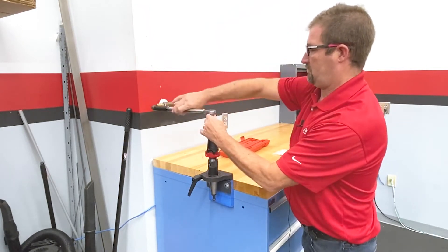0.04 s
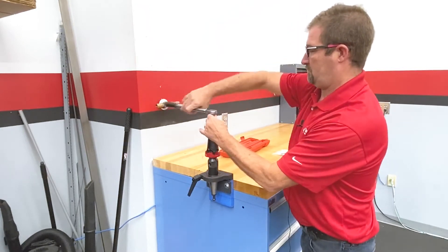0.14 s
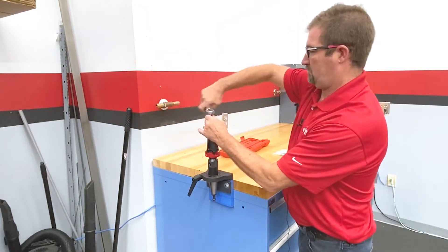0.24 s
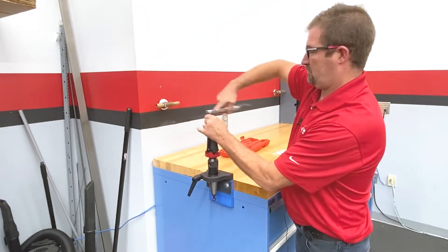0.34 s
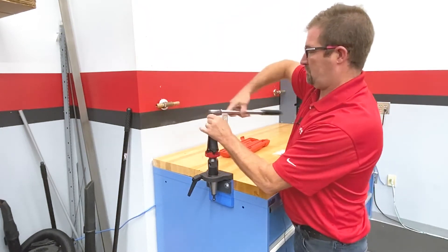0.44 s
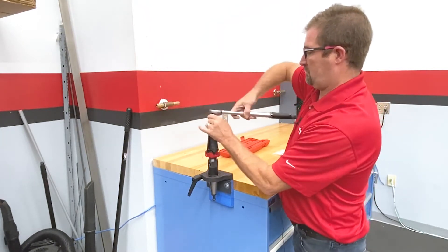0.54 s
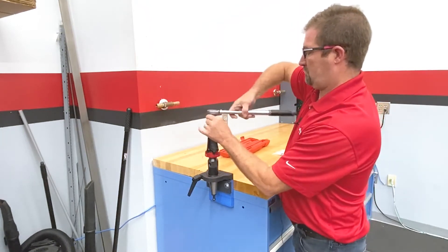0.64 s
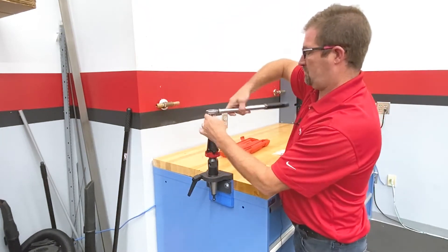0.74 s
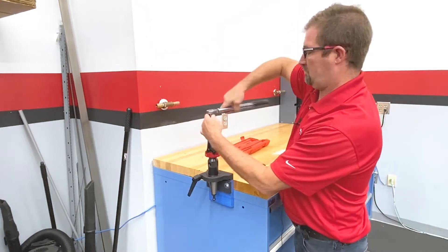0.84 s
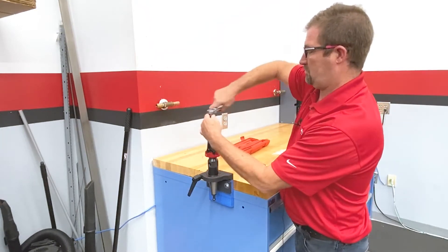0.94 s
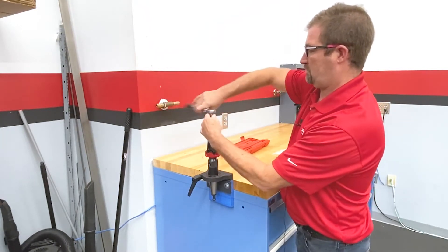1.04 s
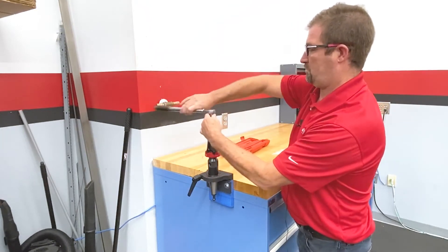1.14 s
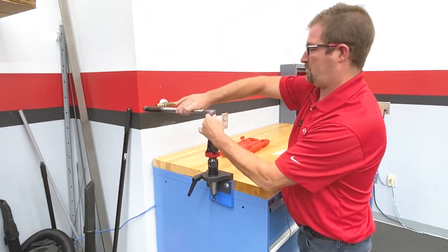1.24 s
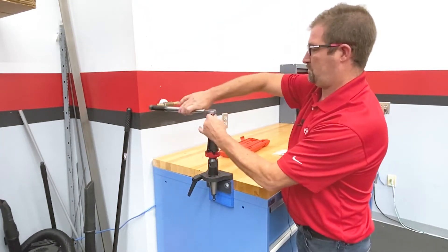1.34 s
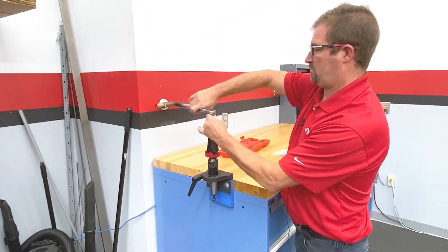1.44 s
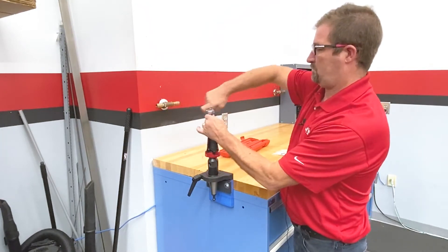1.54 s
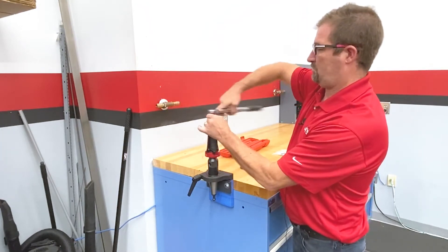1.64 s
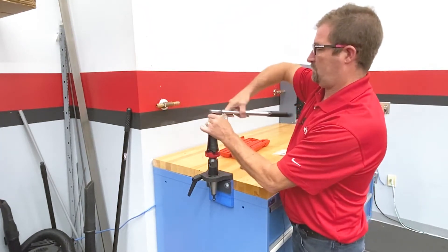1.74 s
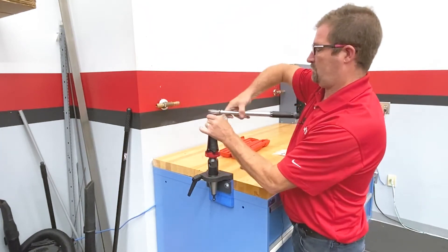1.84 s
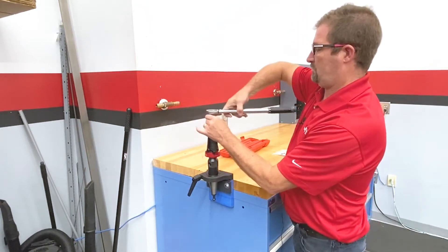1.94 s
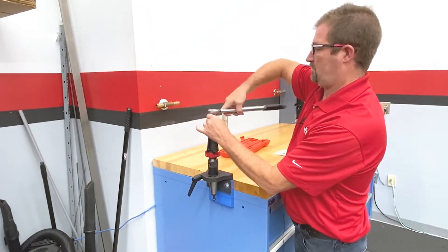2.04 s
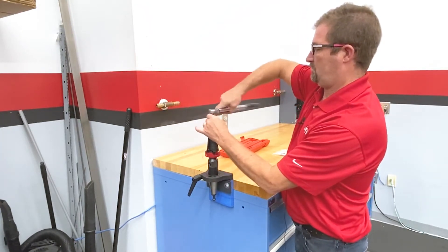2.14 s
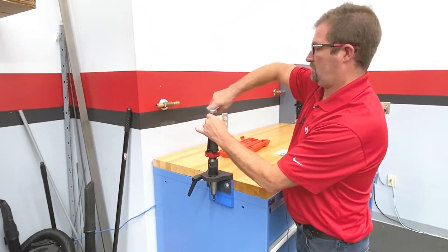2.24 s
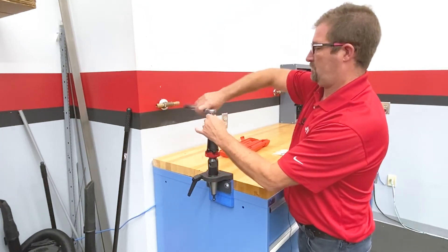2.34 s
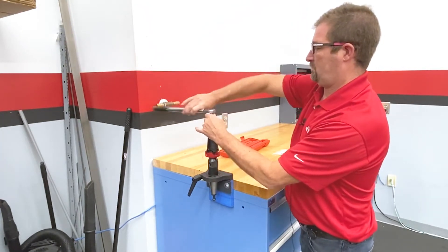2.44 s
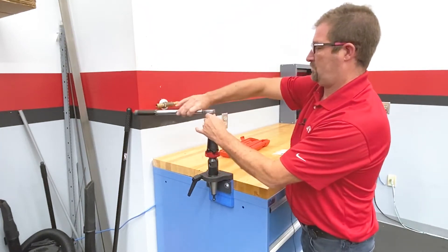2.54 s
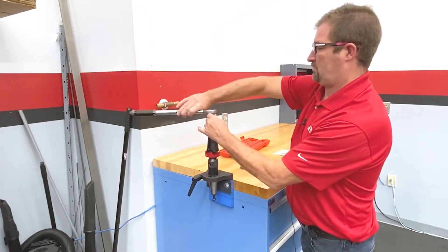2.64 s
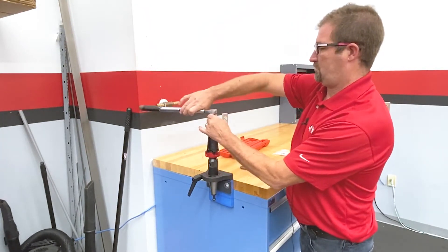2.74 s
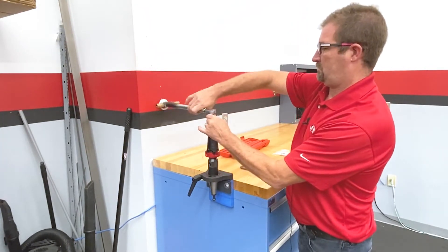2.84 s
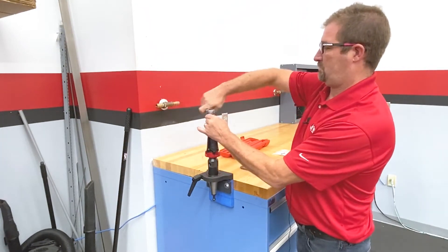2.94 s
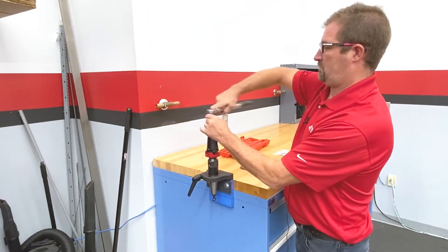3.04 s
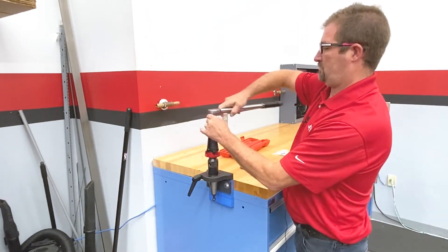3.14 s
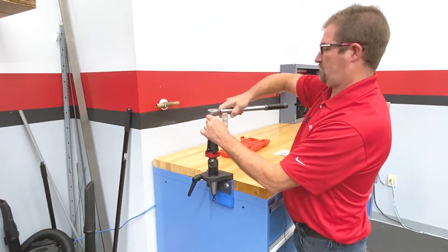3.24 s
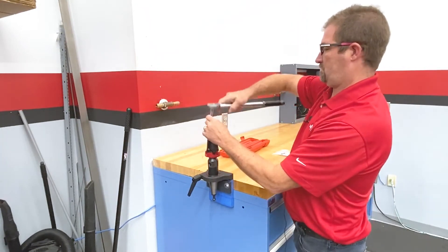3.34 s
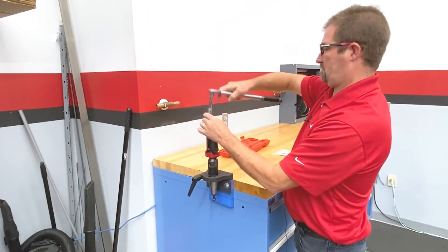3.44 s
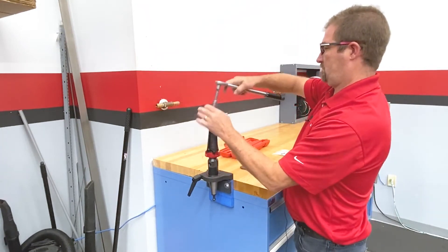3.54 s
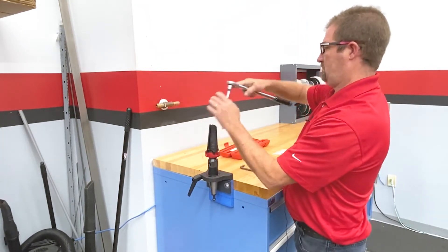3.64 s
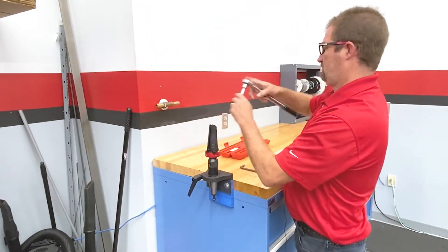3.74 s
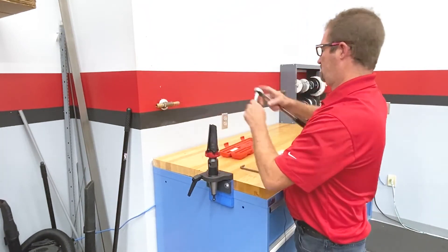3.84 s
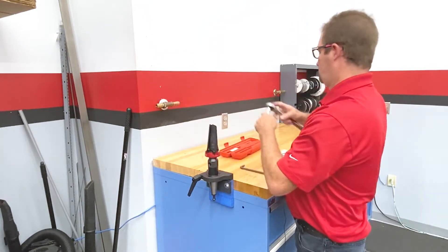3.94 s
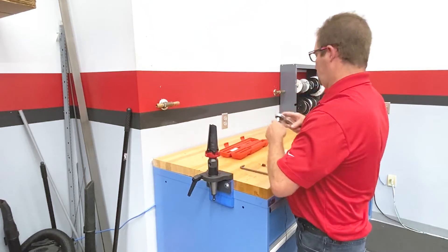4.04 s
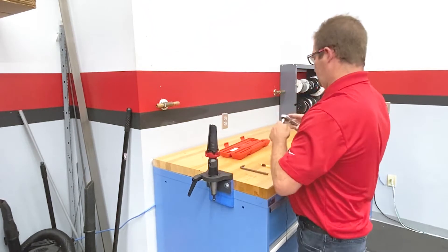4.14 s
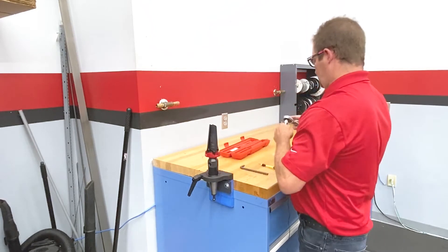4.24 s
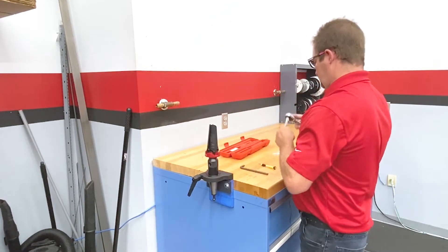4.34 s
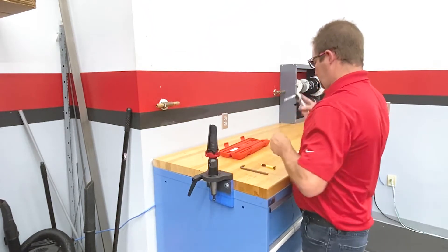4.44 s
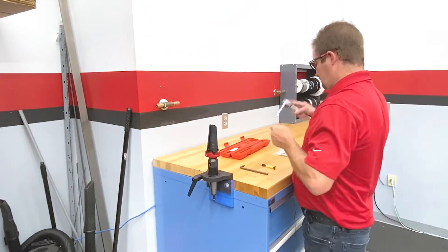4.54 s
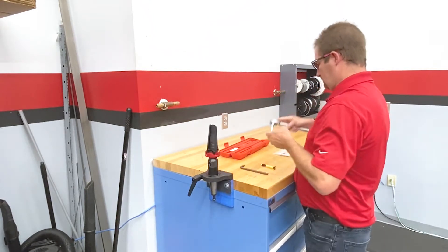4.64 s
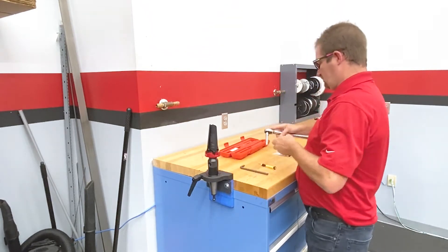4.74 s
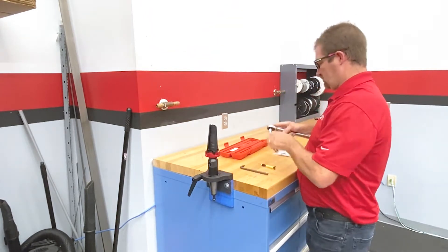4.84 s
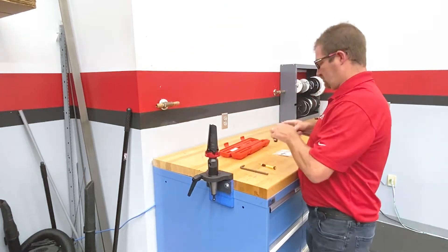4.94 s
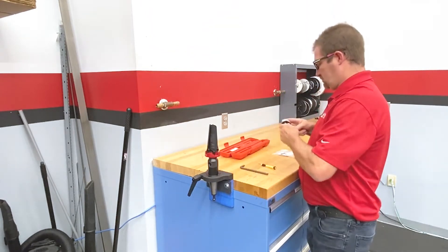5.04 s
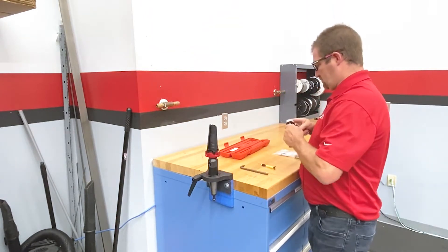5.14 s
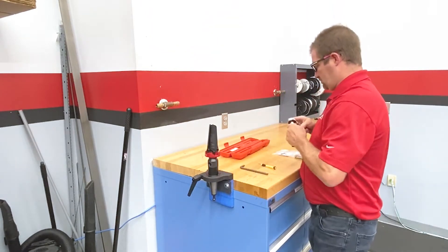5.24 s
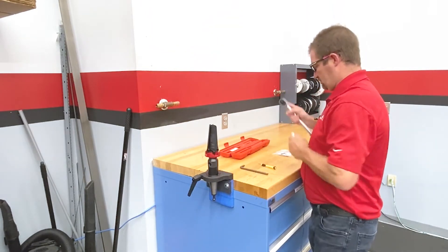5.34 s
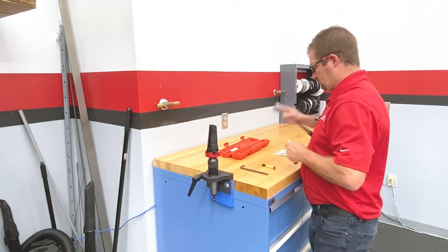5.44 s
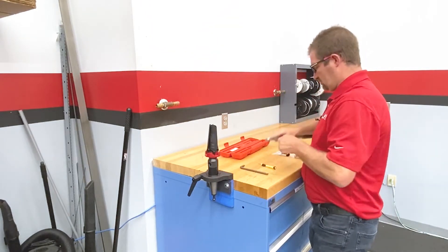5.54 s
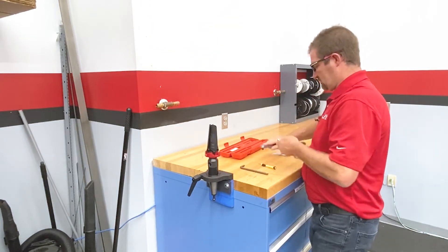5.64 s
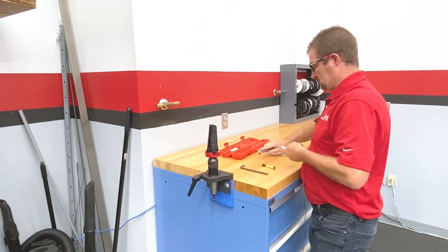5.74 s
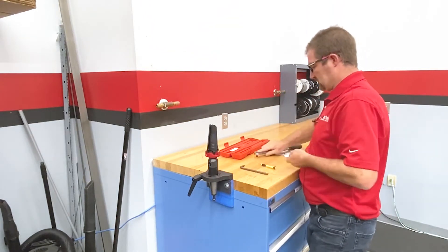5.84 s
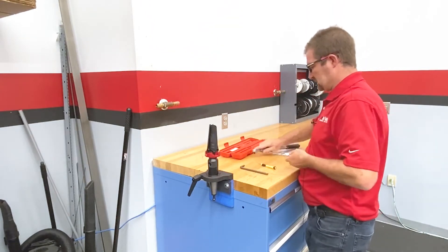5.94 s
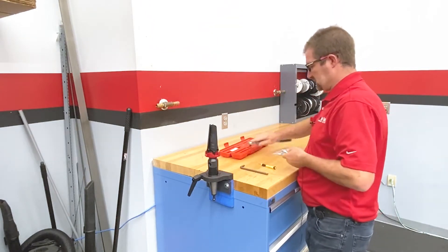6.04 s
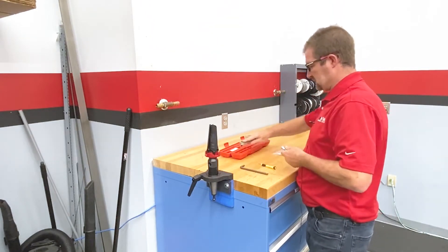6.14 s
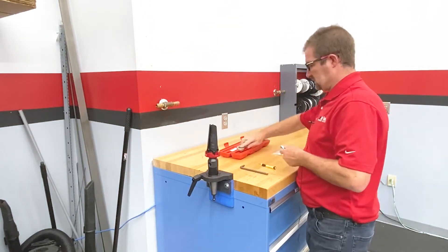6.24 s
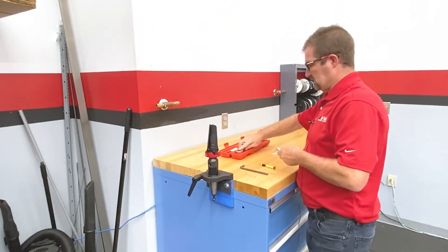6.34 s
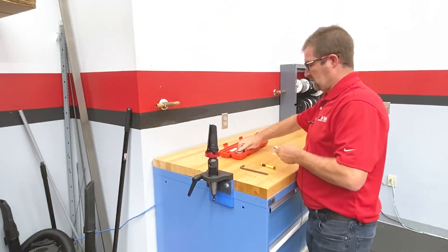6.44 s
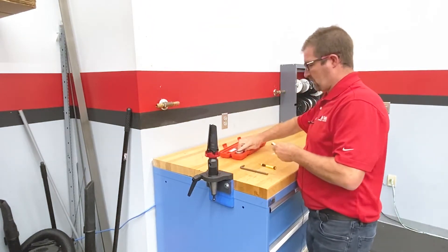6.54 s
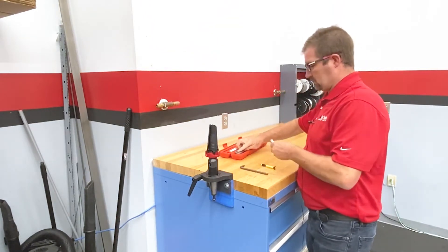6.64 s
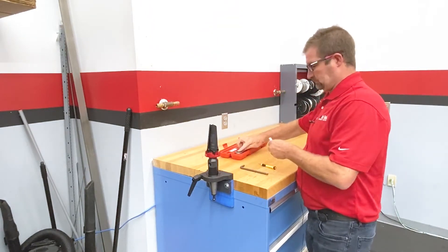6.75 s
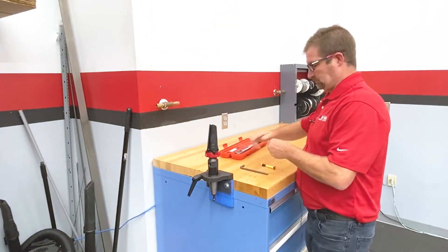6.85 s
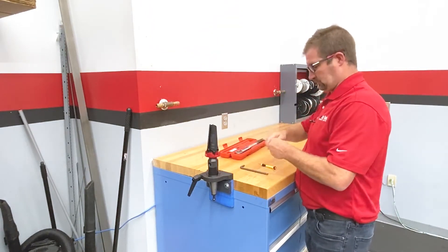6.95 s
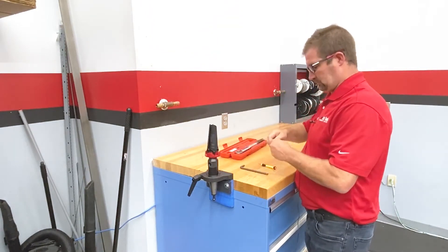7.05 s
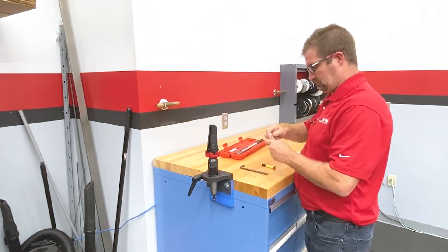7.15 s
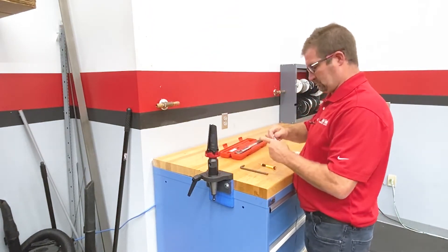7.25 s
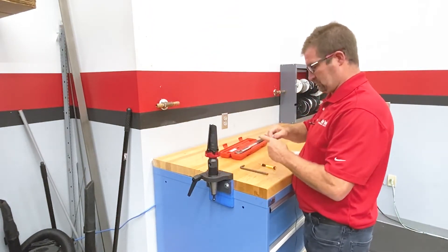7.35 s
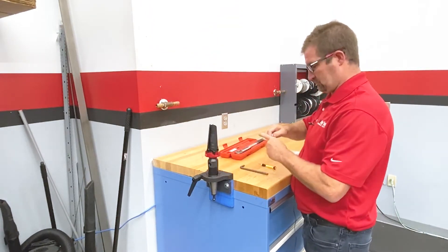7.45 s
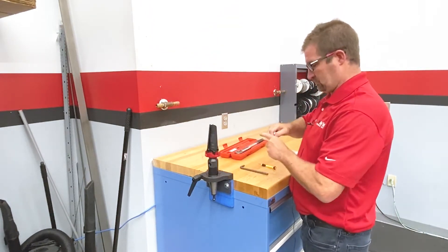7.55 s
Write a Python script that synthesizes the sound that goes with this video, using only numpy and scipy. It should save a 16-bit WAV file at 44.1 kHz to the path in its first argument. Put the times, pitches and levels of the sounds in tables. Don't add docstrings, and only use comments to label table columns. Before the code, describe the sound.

A steady, low ventilation hush fills a hard-walled workshop with nearly a second of reverberation. From about 0.16 to 0.6 s a ratchet wrench gives a dozen quick, crisp pawl clicks, with thread creaks and dull vice knocks beneath. After a pause with a small clink at 0.7 s, a second run of ten clicks goes from 1.48 to 1.9 s, and a third from 2.84 to 3.25 s. Light steel rattling leads to a sharp loud snap at 3.53 s and a smaller clink at 3.8 s. Quieter handling follows, with bright socket clinks at 4.39 and 5.06 s. The wrench is put down with a soft knock at 5.84 s. The plastic case is nudged at 6.44 and knocked at 6.6 s, then a loud, hollow, booming clunk hits at 6.7 s, bouncing briefly. Thin nut rings and steel clinks come at 7.33, 7.39 and 7.57 s.

```python
import sys
import numpy as np
from scipy import signal
from scipy.fft import rfft, irfft
from scipy.io import wavfile
from scipy.ndimage import uniform_filter1d

SR = 44100
rng = np.random.default_rng(int(sys.argv[2]) if len(sys.argv) > 2 else 0)


def to_wav(sig):
    pcm = np.clip(np.atleast_2d(sig), -1, 1) * 32767
    pcm = np.round(pcm).astype(np.int16)
    wavfile.write(sys.argv[1], SR, pcm.T)


def invert_db(x):
    u = np.asarray(x, float) / 20
    return 10 ** u


N = 335160


def along(table, hz):
    rows = np.array(table, float)
    return np.interp(np.log(hz), np.log(rows[:, 0]), rows[:, 1])


def unit(x):
    return x / np.sqrt(np.mean(x ** 2))


def resonate(x, hz, width):
    return signal.lfilter(*signal.iirpeak(hz, hz / width, SR), x)


def walk(rate):
    hold = int(SR / rate)
    steps = np.repeat(rng.standard_normal(N // hold + 1), hold)
    return 0.9 * uniform_filter1d(uniform_filter1d(steps, hold), hold)[:N]


def add(out, s, x):
    i = int(s * SR)
    out[i:i + len(x)] += x[:N - i]


def even(burst):
    spectrum = rfft(burst)
    return irfft(spectrum / np.abs(spectrum) ** .9)


def causal(gain):
    cepstrum = irfft(np.log(gain))
    half = len(gain) - 1
    cepstrum[1:half] *= 2
    cepstrum[half + 1:] = 0
    return irfft(np.exp(rfft(cepstrum)))[:half]


def ring(modes, chance, spread, scatter_db, size):
    hz, db, t60 = np.array(modes, float).T[:, :, None]
    tune, strike = chance[:, :len(hz), None]
    f = np.fft.rfftfreq(size, 1 / SR) + 1
    hz = hz * (1 + spread * tune)
    width = np.log(1000) / np.pi / t60
    detune = (f ** 2 - hz ** 2) / (f * width)
    power = (invert_db(db + scatter_db * strike) * t60) ** 2 / (1 + detune ** 2) ** 1.5
    body = np.sqrt(power.sum(axis=0))
    return body / np.sqrt(np.sum(body ** 2))


def contacts(count, contact_s, snap, skid_s):
    t = np.arange(2048) / SR
    after = np.maximum(t - skid_s, 0)
    before = np.maximum(1 - t / max(skid_s, 1 / SR), 0) * (skid_s > 0)
    shape = (1 - np.exp(-t / (0.11 * contact_s))) * np.exp(-after / contact_s - 0.71 * before)
    chatter = even(rng.standard_normal((count, 2048)) * shape)
    chatter *= np.exp(-after / (4 * contact_s) - 0.49 * before)
    chatter[:, int(skid_s * SR)] += snap * np.abs(chatter).max(axis=1)
    return chatter


def strikes(table, groups, contact_s, spread, scatter_db, last_db=0, size=4096, snap=0, skid_s=0):
    out = np.zeros(N)
    chance = rng.standard_normal((len(table), len(groups), 2, 12))
    pushes = contacts(len(table), contact_s, snap, skid_s)
    for (s, db, *group_db), luck, push in zip(table, chance, pushes):
        power = 0
        for modes, share_db, c in zip(groups, [*group_db, last_db], luck):
            power = power + (invert_db(share_db) * ring(modes, c, spread, scatter_db, size)) ** 2
        blow = signal.fftconvolve(causal(np.sqrt(power)), push)
        add(out, s, invert_db(db) * blow / np.abs(blow).max())
    return out


def shared(table):
    place = np.arange(4) - 1.5
    outer = place ** 2 - np.mean(place ** 2)
    return [(s, db, *(bright_db * place + hollow_db * outer)) for s, db, bright_db, hollow_db in table]


def favoured(rows, contact_s, size):
    out = np.zeros(N)
    for s, db, hz, t60 in rows:
        pair = [(hz, 0, t60), (1.012 * hz, -5, t60)]
        out += strikes([(s, db)], [pair], contact_s, 0, 0, size=size)
    return out


def hum(table, hz, t60):
    out, t = np.zeros(N), np.arange(SR) / SR
    swell = (1 - np.exp(-t / 0.012)) ** 2
    for s, db in table:
        add(out, s, invert_db(db) * np.sin(2 * np.pi * hz * t) * swell * 1000 ** (-t / t60))
    return out


# f/Hz, level/dB per Hz
HUSH = [(15, -56), (25, -17), (92, 1), (153, -7.5), (242, -2.5), (326, -6.5), (363, -10.5), (439, -0.5),
        (545, -9.5), (591, -7), (887, -5), (1020, -8), (1260, -10), (2350, -18), (16000, -39.5)]
# f/Hz, width/Hz, level/dB
DUCT_NOTES = [(99, 25, -62), (151, 11, -55.5), (280, 18, -64.5), (450, 49, -63.5), (715, 180, -70)]


def ventilation():
    hz = np.maximum(np.fft.rfftfreq(N, 1 / SR), 1)
    hush = unit(irfft(rfft(rng.standard_normal(N)) * invert_db(along(HUSH, hz)), N))
    out = hush * invert_db(-44 - 5.0 + 0.74 * walk(1.7))
    for f, width, db in DUCT_NOTES:
        out += unit(resonate(rng.standard_normal(N), f, width)) * invert_db(db + 2.7 * walk(4.8))
    return out


# f/Hz, t60/s
HALL_FADE = [(100, 1), (500, 0.82), (2000, 0.93), (5000, 0.77), (9000, 0.43), (14000, 0.31)]
# t/s, level/dB
FIRST_ECHOES = [(.004, -8), (.01, -14), (0.02, -30.5)]


def hall():
    t = np.arange(SR + SR // 2) / SR
    tail = np.zeros(len(t))
    for hz in 50 * 2 ** np.arange(0, 8.6, .5):
        band = resonate(rng.standard_normal(len(t)), hz, hz / 1.9)
        tail += band * 1000 ** (-t / along(HALL_FADE, hz))
    tail *= 1 - np.exp(-t / 0.00043)
    response = invert_db(-5) * tail / np.sqrt(np.sum(tail ** 2))
    for s, db in FIRST_ECHOES:
        patch = even(rng.standard_normal(180) * np.hanning(180)) * np.hanning(180)
        add(response, s, invert_db(db) * patch / np.sqrt(np.sum(patch ** 2)))
    return response


def hall_answer(x):
    turn = 2 * np.pi * 3.7 * np.arange(N) / SR
    out = np.zeros(N)
    for k in range(3):
        part = x * np.sqrt(2 / 3) * np.cos(turn + k * 2 * np.pi / 3)
        out += signal.fftconvolve(part, hall())[:N]
    return out


# t/s, level/dB (peak)
CABINET_BLOWS = [
    (.18, -39.5),
    (.8, -41),
    (5.86, -26),
    (6.45, -37.5),
    (6.61, -26.5),
    (6.707, -17.5),
    (6.86, -26),
]


def cabinet_boom():
    return hum(CABINET_BLOWS, hz=81.8, t60=0.33)


# t/s, level/dB (peak)
BENCH_TOUCHES = [
    (.79, -30),
    (5.84, -29),
    (6.443, -24),
    (6.705, -21),
]


def bench_thud():
    return hum(BENCH_TOUCHES, hz=212, t60=0.22)


# t/s, level/dB (peak), f/Hz
SLACK_KNOCKS = [(0.175, -33, 482), (0.245, -30, 476), (0.323, -33, 522), (0.362, -31, 476),
                (0.493, -26, 611), (0.609, -31, 622), (0.797, -27, 519), (0.898, -32, 269),
                (0.945, -38, 533), (1.483, -38, 525), (1.542, -31, 466), (1.582, -32, 272),
                (1.648, -34, 614), (1.688, -33, 476), (1.732, -32, 466), (1.763, -30, 519),
                (1.819, -33, 277), (1.913, -32, 611), (2.04, -33, 466), (2.163, -39, 264),
                (2.757, -38, 390), (2.907, -36, 466), (3.034, -33, 398), (3.16, -28, 606),
                (3.239, -34, 522), (3.371, -34, 404)]


def slack_knocks():
    return favoured([(s, db - 8, hz, 0.02) for s, db, hz in SLACK_KNOCKS], 0.008, size=4096)


# f/Hz, width/Hz, level/dB
VICE_BODY = [(208, 70, -5), (270, 80, -1), (400, 140, -1), (530, 160, 0), (680, 240, -5)]
# f/Hz, width/Hz, level/dB
THREAD_BODY = [(1173, 830, 12.5), (1560, 600, -3), (1917, 1800, 0)]
# t/s, held/s, rumble level/dB,
# scrape over rumble/dB
HAND_PUSHES = [(.17, 0.082, -39.5, 4.5), (.24, 0.22, -44, 5), (.4, 0.23, -42, 2), (.775, 0.13, -41, -2),
               (1.4, 0.012, -43.5, 1), (1.485, 0.12, -41, 6), (1.681, 0.18, -39, -1),
               (1.909, 0.017, -39, -1), (2.01, 0.045, -50.5, 0), (2.765, .02, -40.5, 1.5),
               (2.9, 0.03, -40, 6), (3.03, 0.08, -39, 6), (3.14, .09, -39, 5), (3.375, 0.12, -43, 12),
               (5.86, 0.093, -37, -7.5), (3.525, 0.007, -39.5, 5)]


def coloured(grains, body):
    return unit(sum(invert_db(db) * resonate(resonate(grains, hz, w), hz, w) for hz, w, db in body))


def thread_grind():
    grains = rng.standard_normal(N) * invert_db(3.0 * walk(60) + 2.2 * walk(18))
    rumble, scrape = coloured(grains, VICE_BODY), coloured(grains, THREAD_BODY)
    out, t = np.zeros(N), np.arange(N) / SR
    lean_db_per_s, let_go_db_per_s, grip_s = 14.5, 113, 0.0041
    for s, held, rumble_db, scrape_db in HAND_PUSHES:
        load_db = lean_db_per_s * np.clip(t - s, 0, held)
        load_db -= let_go_db_per_s * np.maximum(t - s - held, 0)
        push = np.clip((t - s) / grip_s, 0, 1) * invert_db(rumble_db + load_db)
        out += push * (rumble * invert_db(-5.5) + scrape * invert_db(scrape_db - 10.5))
    return out


# t/s, level/dB (peak)
BALL_TINKLES = [(3.972, -71), (4.574, -70), (4.70, -63), (5.04, -71), (5.39, -65), (5.482, -58),
                (5.72, -72), (5.86, -62), (5.905, -59)]
# f/Hz, level/dB, t60/s
BALL_NOTE = [(12780, 0, 0.043)]


def ball_tinkle():
    return strikes(BALL_TINKLES, [BALL_NOTE], contact_s=0.0018, spread=0.0022, scatter_db=1.5, size=16384)


# t/s, level/dB (peak)
NUT_HITS = [(5.7089, -34), (5.733, -32), (5.748, -31.5), (6.1055, -29.5), (6.114, -34), (6.14, -38),
            (7.0454, -42.5), (7.3277, -13), (7.3886, -9.5)]
# f/Hz, level/dB, t60/s
NUT_NOTES = [(9280, -1, 0.04), (9370, 0, 0.07), (9460, 3, 0.05), (9560, 1, 0.04), (9720, -1, 0.03),
             (9480, 14, 0.005)]


def nut_ring():
    return strikes(NUT_HITS, [NUT_NOTES], contact_s=0.003, spread=0.004, scatter_db=2.5, size=16384, snap=1.5)


# t/s, level/dB (peak), f/Hz, t60/s
SOCKET_TOUCHES = [(.708, -31.5, 4600, 0.0064), (3.8, -35.5, 2424, 0.033), (4.2, -46, 7800, 0.0062),
                  (4.209, -43.5, 2660, .02), (4.327, -49, 6270, .015), (4.384, -12.5, 9800, 0.0017),
                  (4.391, -22, 2850, 0.004), (4.68, -50, 2910, 0.027), (5.062, -10.5, 4250, 0.0035),
                  (5.058, -24, 9700, .003), (5.33, -36, 2470, 0.07), (5.332, -27, 2850, 0.005),
                  (5.335, -37.5, 10200, 0.051), (5.337, -33, 9500, 0.012), (5.71, -39, 6900, 0.006),
                  (5.735, -38, 6300, 0.004), (5.861, -40, 2520, 0.045), (5.897, -45, 2500, 0.04),
                  (5.845, -28.5, 830, 0.058), (4.395, -31, 3530, 0.006), (4.4, -28, 2900, .005),
                  (6.21, -36, 3300, .005), (6.225, -36, 3900, .005), (6.111, -37, 4100, 0.018),
                  (6.197, -29.5, 3800, 0.0034), (5.868, -28.5, 950, 0.059), (3.41, -35, 1920, 0.02),
                  (3.428, -33, 1423, 0.02), (7.33, -27, 2150, 0.015), (7.329, -25, 3760, .005),
                  (7.335, -27, 3280, .012), (7.34, -29, 2660, .012), (7.395, -25, 2300, .01),
                  (7.398, -28, 3600, .005), (7.568, -19, 6200, 0.008), (7.567, -12.5, 10500, 0.003)]


def socket_touches():
    return favoured(SOCKET_TOUCHES, 0.0025, size=8192)


# f/Hz, level/dB, t60/s
STEEL_NOTES = [
    [(800, -12, .003), (1300, -9, .003), (2000, -7, .003), (2550, -1, .003), (2950, -1, .003)],
    [(3500, -1, .003), (4100, 0, .003), (4600, -1, .003), (5200, -1, .003)],
    [(5800, -2, .003), (6400, 0, .004), (7000, -1, .003), (7700, -2, .003)],
    [(8500, -2, .003), (9300, 0, .0025), (10200, 0, .0025), (11000, -9, .003)],
    [(11900, -15, .002), (13000, -16, .002), (14200, -17, .002), (15300, -19, .002)],
]
# t/s, level/dB (peak), brightness/dB per group, hollowness/dB
SLIDES = [(.7076, -19, -1.5, 1), (.7194, -31, 4, -7), (1.2508, -38.5, -5, -2.5), (3.3654, -27, -5, -8),
          (3.39, -32, -1, -5), (3.45, -35, -4, -1), (3.469, -26, -2.5, -1), (3.5534, -15, 3, -2.5),
          (1.028, -40.5, -3, 0), (4.3087, -42, -5, -2.7), (4.379, -25, 2, -9), (4.3964, -21.5, 4, 2),
          (4.6798, -48, -5, -1), (5.0724, -17, -10, -10.5), (5.327, -25.5, -1, 4), (5.333, -28, -1.2, -3),
          (5.341, -32, -3, -5), (5.7082, -36.5, -0.5, -3.5), (5.8948, -33, -1.5, -4),
          (6.113, -28.5, 3.5, 4), (6.195, -34.5, 1.5, -3), (6.205, -32, -6, -10), (6.215, -35, -6, -3),
          (6.226, -32.5, -5, -3), (6.236, -41, -2, -5), (6.777, -17, -4.5, 4), (7.0444, -40, 1, -9),
          (7.3325, -17.5, -6.5, -4), (7.3886, -13.5, 1.5, 1.5), (7.3945, -15, 0, -3), (7.5739, -15, -3, -1)]


def steel_slides():
    return strikes(shared(SLIDES), STEEL_NOTES, contact_s=0.0071, spread=0.04, scatter_db=1.5, last_db=-11.0)


# t/s, level/dB (peak), brightness/dB per group, hollowness/dB
CLINKS = [(1.8955, -22, 8, 7), (7.3277, -11, -2, -2), (1.3878, -37.5, -1.5, -1), (2.2005, -29, 2, -3),
          (2.657, -30.5, -2, -4), (2.766, -38.5, 1, -5), (3.3555, -31, -9, -5), (3.3618, -23.5, -3, 2),
          (3.373, -28.5, -3, -10.5), (3.383, -26.5, -2, 1), (3.4045, -29, 3, -3), (3.411, -30, 2, -2.5),
          (3.4165, -23.5, 6, -1.5), (3.422, -26, 4, -5), (3.428, -25, -3, -7), (3.4445, -29, 0, -1),
          (3.4945, -26, 2, 3), (3.4995, -20, 1, -8), (3.5278, -2.5, -0.5, -2), (3.5325, -2.5, 5.5, -1.5),
          (3.7972, -17, -2, -1), (2.833, -33, 1, -5), (4.199, -42, 0, -3), (4.3829, -14.5, 2.5, -3.5),
          (4.3917, -11.5, 15, 11), (5.0546, -5.5, 4.5, 0), (5.0598, -7, -2.5, -2), (5.0628, -9.5, 4, 1),
          (5.068, -12, -6, -7.5), (6.106, -26, -4, -12), (6.4694, -27, -3, 5), (6.652, -16, -7, 5),
          (7.5676, -8.5, 1.5, -0.5), (7.571, -14, 2, -3)]


def steel_clinks():
    return strikes(shared(CLINKS), STEEL_NOTES, contact_s=0.0021, spread=0.021, scatter_db=1.5,
                   last_db=-5, snap=1.6)


# t/s, level/dB (peak), f/Hz, t60/s
CASE_RINGS = [(5.842, -33, 760, .03), (5.87, -34, 900, .08), (5.9, -36, 820, .08), (5.95, -37, 880, .08),
              (6.0, -39, 840, .08), (6.47, -24, 560, .03), (6.602, -21, 930, .03), (6.694, -13, 1050, .012),
              (6.706, -8, 926, .04), (6.712, -15, 689, .05), (6.735, -15, 700, .04), (6.78, -19, 950, .03)]


def case_ring():
    return favoured(CASE_RINGS, 0.004, size=4096)


# f/Hz, level/dB, t60/s
BENCH_NOTES = [
    [(131, -1.5, 0.008), (219, -19.5, 0.1), (304, -3.5, 0.022), (383, 1, 0.028), (521, 7.5, 0.019)],
    [(618, 6.5, 0.012), (641, 7, 0.027), (805, 13.5, 0.0086), (900, 0.5, 0.037), (987, 7, 0.012),
     (1160, 10, 0.0067), (1290, -12, 0.015)],
    [(1457, 8, 0.0022), (1570, -8, 0.0099), (2220, -7.5, 0.0043), (2705, -8, 0.0045)],
    [(3340, -0.5, 0.0015), (4100, -16.5, 0.0026), (5450, -6, 0.0021), (6270, -10.5, 0.0012)],
    [(7750, 15, 0.00082), (9800, -48, 0.0018), (11200, -40, 0.0013), (14400, 3, .0015)],
]
# t/s, level/dB (peak), brightness/dB per group, hollowness/dB
ROLLS = [(.172, -28, -2, -1.5), (.494, -23.5, -2, 4), (.797, -26, -4.5, 1), (1.913, -34, -1, -3),
         (1.999, -50, -1, -7), (3.401, -35, 10, -8), (3.439, -26.5, 9, -3), (5.84, -22, -7.5, -2),
         (5.868, -28.5, -3.5, -0.5), (5.89, -25.5, -13, -5.5), (5.92, -32, -9, -13), (6.445, -13, -5.5, -6),
         (6.474, -19, -5, -2), (6.51, -24, 1, -5), (6.539, -24.5, -2.5, -7), (6.598, -16, -6, -6),
         (6.714, -12, -5, -1.5), (6.739, -16, -18, 5)]


def bench_rolls():
    return strikes(shared(ROLLS), BENCH_NOTES, contact_s=0.013, spread=0.016, scatter_db=0.0,
                   last_db=-18.5, size=16384)


# t/s, level/dB (peak), brightness/dB per group, hollowness/dB
BLOWS = [
    (3.529, -24, -5, -11),
    (5.838, -20, -4, -0.5),
    (6.384, -20, -3, -5.5),
    (6.441, -10, -1, -8),
    (6.599, -13, 3.5, -9),
    (6.693, -8.5, -4, -4.5),
    (6.702, 6, .5, -5),
    (6.706, 2.5, -1, -7),
    (6.774, -8, -2, -1),
    (6.813, -13, -3, -1),
]


def bench_blows():
    return strikes(shared(BLOWS), BENCH_NOTES, contact_s=0.005, spread=0.0088, scatter_db=0.0,
                   last_db=-12, size=16384)


# t/s, level/dB (peak), lower f/Hz, upper f/Hz
TOOTH_NOTES = [(0.2498, -8, 5030, 12900), (0.2887, -10, 6560, 13700), (0.3177, -12, 7000, 8410),
               (0.3541, -9, 6430, 11900), (0.3945, -11, 4880, 8540), (0.4324, -8, 4960, 12100),
               (0.4808, -12, 6420, 13300), (0.5297, -7, 6800, 12200), (0.5955, -7, 5050, 11900),
               (1.4815, -9, 4060, 9940), (1.5239, -8, 5210, 12100), (1.5658, -10, 6560, 10000),
               (1.6018, -11, 4960, 12700), (1.6377, -9, 7190, 13400), (1.6751, -7, 4990, 10800),
               (1.7135, -7, 5330, 12500), (1.7604, -6, 5030, 13300), (1.8073, -4, 5000, 13400),
               (1.9031, -6, 5490, 8600), (2.8419, -9, 5010, 8330), (2.8948, -10, 7140, 10300),
               (2.9402, -11, 5420, 13400), (2.9806, -9, 4660, 12400), (3.0185, -8, 7420, 8420),
               (3.052, -8, 4550, 13300), (3.0859, -11, 5010, 8190), (3.1198, -12, 6200, 8420),
               (3.1702, -6, 5070, 8360), (3.252, -7, 4950, 12400)]


def tooth_notes():
    rows = []
    for s, db, lower, upper in TOOTH_NOTES:
        rows += [(s + 0.0008, db - 9, lower, 0.0035), (s + 0.0008, db - 10, upper, 0.0035)]
    return favoured(rows, 0.0012, size=1024)


# f/Hz, level/dB, t60/s
HEAD_NOTES = [
    [(2880, -4.5, 0.0018), (4040, -3.5, 0.0034), (5005, 1, 0.0022)],
    [(5970, -7.5, 0.0026), (6930, 0, 0.002)],
    [(8200, 0, 0.0021), (9300, -6.5, 0.0019), (10270, -3, 0.0025)],
    [(11300, -4, 0.002), (12400, 0, 0.0022), (13500, -5.5, 0.0023), (14500, -0.5, 0.0012)],
    [(1950, 0, 0.00064)],
]
HEAD_SHARES = [-0.5, -3, -0.5, 0.5]
# t/s, level/dB (peak), brightness/dB per group, hollowness/dB
PAWL_CLICKS = [(.164, -14, 1, -1.5), (.2332, -24, -7, 1), (.25, -7, 1, -2), (.2886, -9.5, 0.5, 0),
               (.3177, -8, -1.5, -1), (.3535, -8, 0, -1.5), (.3945, -8, 1, -1.5), (.4324, -6, 1, 0.5),
               (.4812, -12, -2, -1.5), (.499, -21, 5, 2), (.5302, -5, 1.5, 0), (.5956, -7.5, 1, 0),
               (1.4821, -8.5, -1, 1), (1.5246, -6, 0, 1.5), (1.566, -8.5, -0.5, 0), (1.6016, -8, 2.5, 1),
               (1.6381, -8, -0.5, 0), (1.675, -5.5, -0.5, -1), (1.7135, -9.5, -1, -0.5),
               (1.76, -7.5, 0, 0.5), (1.807, -6, -0.5, 1.5), (1.9033, -5.5, -0.5, -1),
               (2.8422, -10, -1, -1), (2.8947, -7.5, 1.5, -1), (2.9407, -8.5, 0.5, 0),
               (2.9814, -9, 0.5, 1.5), (3.0186, -7.5, 1.5, -1.5), (3.052, -9.5, -0.5, -1),
               (3.086, -8.5, 1.5, -2), (3.12, -11.5, 0, -2), (3.1703, -5.5, -1, 0.5), (3.252, -7.5, 1, 0.5)]


def pawl_clicks():
    teeth = [(s, db - 0.7, *np.add(group_db, HEAD_SHARES)) for s, db, *group_db in shared(PAWL_CLICKS)]
    return strikes(teeth, HEAD_NOTES, contact_s=0.0015, spread=0.015, scatter_db=2, last_db=-13,
                   snap=1.8, skid_s=0.0014)


def scene():
    near = slack_knocks() + thread_grind() + ball_tinkle() + nut_ring() + socket_touches()
    near += steel_slides() + steel_clinks() + bench_rolls() + bench_blows() + pawl_clicks()
    beamed = case_ring() + tooth_notes()
    echoes = hall_answer(near + invert_db(-7) * beamed)
    return (ventilation() + echoes + cabinet_boom() + bench_thud() + near + beamed)[None]


def band_limit(x):
    return signal.sosfilt(signal.butter(12, 16480, fs=SR, output="sos"), x)


def record(dry):
    top = signal.ellip(7, .3, 32, 15650, fs=SR, output="sos")
    low = signal.butter(2, 45, "high", fs=SR, output="sos")
    mix = np.clip(signal.sosfilt(np.vstack([top, low]), dry), -.99, .99)
    return band_limit(mix)


dry = scene()
out = record(dry)
to_wav(out)
```